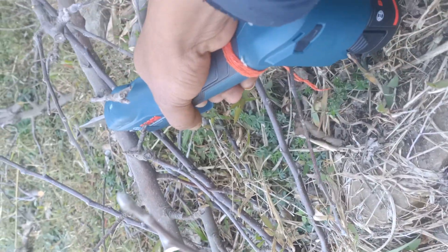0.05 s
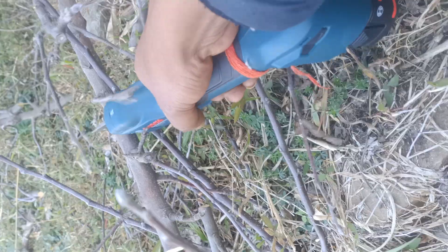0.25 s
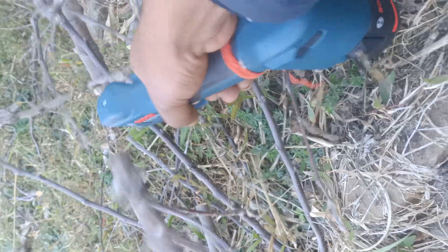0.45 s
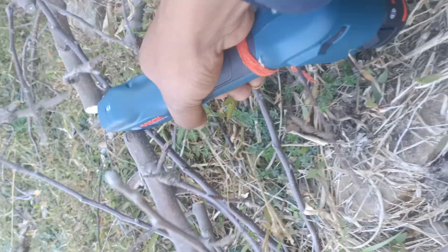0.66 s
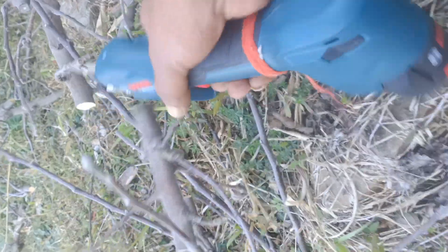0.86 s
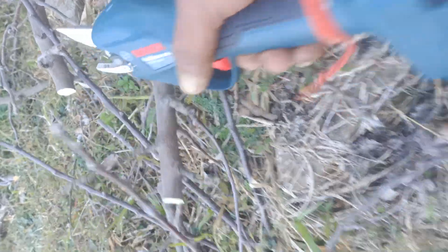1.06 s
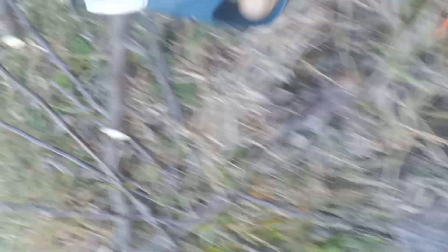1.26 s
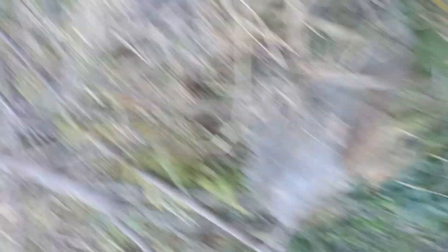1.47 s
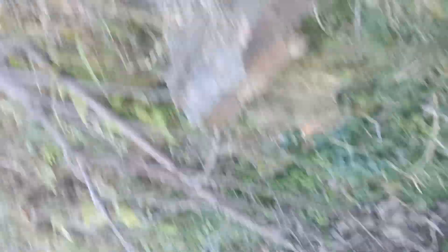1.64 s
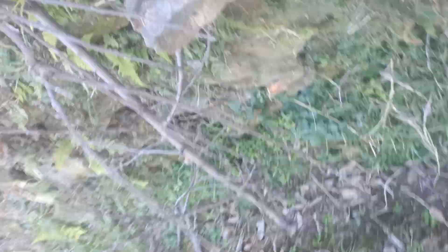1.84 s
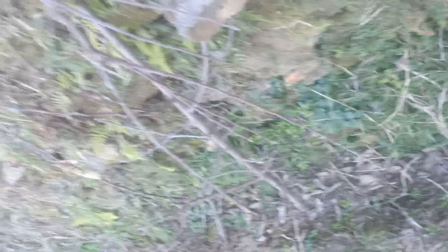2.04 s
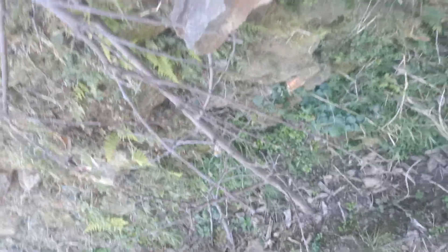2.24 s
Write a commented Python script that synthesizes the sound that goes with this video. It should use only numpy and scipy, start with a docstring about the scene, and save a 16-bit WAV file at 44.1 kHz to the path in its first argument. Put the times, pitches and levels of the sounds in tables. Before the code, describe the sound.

Electric pruning shears whir and cut a branch with a snap, whir again, then twigs rustle.

```python
"""A cordless pruner cuts a thin branch outdoors, close to a two-port microphone.
Its geared motor whines and rattles, sagging under load; fibres tear and the wood snaps and rings.
A faint tone hangs on, then the motor runs again to open the blade.
Sleeve and twigs rustle, scrape and tick as the tool is drawn away, over a light rumble of wind."""
import sys
import numpy as np
from scipy import signal
from scipy.fft import rfft, irfft, next_fast_len
from scipy.io import wavfile
from scipy.ndimage import map_coordinates

SR = 44100
rng = np.random.default_rng(int(sys.argv[2]) if len(sys.argv) > 2 else 0)


def waveform_to_disk(signal):
    """Save audio, clipped to [-1, 1], as 16-bit WAV at the path in sys.argv[1]."""
    frames = np.transpose(np.atleast_2d(signal))
    scaled = np.clip(frames, -1, 1) * 32767
    samples = np.round(scaled).astype(np.int16)
    wavfile.write(sys.argv[1], SR, samples)


N = 101429
T = np.arange(N) / SR
SNAP_S = .4313
RUSTLE_ALIKE, RUSTLE_LAG_MS = 0.27, -0.2

# Motor strokes. Each row: time in seconds, gear mesh rate in Hz, whine and rattle drive in dB.
CLOSING = [(.175, 903, -92, -64), (.203, 1800, -78, -43.5), (.226, 2750, -50.5, -36.5),
           (.24, 3142, -31.5, -29), (.275, 2948, -35.5, -26.5), (.297, 2660, -32.5, -25.5),
           (.335, 2449, -36.5, -24), (.38, 2290, -32, -27), (.428, 2560, -30.5, -23.5),
           (.445, 2500, -57, -32.5), (.49, 1480, -79, -40.5), (.53, 900, -86, -58)]
OPENING = [(.62, 900, -88, -58), (.652, 2300, -64, -35), (.677, 2930, -43, -37.5),
           (.703, 3206, -40.5, -36.5), (.73, 3263, -44.5, -39.5), (.8, 3264, -40, -37),
           (.816, 3100, -44, -39.5), (.835, 2463, -40.5, -39.5), (.854, 1917, -38, -55),
           (.866, 1685, -51, -57), (.91, 980, -73, -62)]


def stroke(curve, partials, housing, jitter, flutter_db, teeth=21):
    """One motor run: gear whine and tooth rattle sound through the housing."""
    mesh_hz, whine_db, rattle_db = in_time(curve)
    phase = running_phase(mesh_hz * (1 + jitter * drift(130)))
    whine = sum(from_db(db) * flutter(flutter_db, 160) * np.sqrt(2) * np.sin(multiple * phase)
                for multiple, db in partials)
    whine *= 1 + 0.19 * np.sin(phase / teeth)  # gear runs slightly off centre
    rattle = spread(lambda: grains(per_s=7000, spread_db=1.5), alike=0.64, arrive=from_tool)
    rattle *= flutter(1.5, 110)
    drive = from_tool(whine * from_db(whine_db)) + rattle * from_db(rattle_db)
    return colour(during(curve) * drive, housing)


def closing_motor():
    """The motor closes the blade, sagging and straining in the wood."""
    # Whine partials. Each row: multiple of the mesh rate, relative level in dB.
    partials = [(.94, -3), (1, 1.5), (1.24, -15.5), (1.89, -8.5)]
    # Housing response. Each row: frequency in Hz, left and right gain in dB.
    housing = [(98.7, -13.5, -66.5), (294, -29.5, -29.5), (677, -16, -19), (1372, -13.5, -15),
               (1980, -10.5, -3), (2470, -14, -10), (3140, -8.5, -3.5), (3460, -7, -25.5),
               (4200, -4.5, -18.5), (4880, -14.5, -39), (6400, -22, -34.5), (8160, -33, -45),
               (11500, -38.5, -35.5), (14900, -39, -55)]
    return stroke(CLOSING, partials, housing, jitter=.008, flutter_db=3.5) + colour(strain(), housing)


def strain():
    """Loaded teeth grind just under the mesh rate; a faster gear stage glides down."""
    # Faster stage. Each row: time in seconds, pitch in Hz, drive in dB.
    upper_whine = [(.255, 4950, -58), (.275, 4600, -37), (.295, 4280, -35), (.315, 4000, -35.5),
                   (.345, 3700, -45)]
    mesh_hz, _, rattle_db = in_time(CLOSING)
    grind = rough_band(.92 * mesh_hz, width_hz=140) * from_db(rattle_db - 17) * during(CLOSING)
    hz, db = in_time(upper_whine)
    phase = running_phase(hz * (1 + .004 * drift(130)))
    return from_tool(grind + np.sqrt(2) * np.sin(phase) * from_db(db) * during(upper_whine))


def opening_motor():
    """The motor runs free, with a steadier whine, to open the blade."""
    # Whine partials. Each row: multiple of the mesh rate, relative level in dB.
    partials = [(1, -1), (1.332, -17), (1.665, -12), (2.001, -10)]
    # Housing response. Each row: frequency in Hz, left and right gain in dB.
    housing = [(100, -21, -18), (302, -16, -18), (648, -8.5, -9.5), (1200, -13, -15), (1730, -6, -3),
               (2660, -18.5, -10.5), (3300, -13.5, -27), (4000, -8.5, -16), (4740, -11.5, -34),
               (6320, -20.5, -32), (8150, -34.5, -38), (15000, -36, -37)]
    return stroke(OPENING, partials, housing, jitter=.004, flutter_db=3)


def rasp():
    """The drive rasps in a climbing band as it runs back."""
    # Each row: time in seconds, centre in Hz, level in dB.
    curve = [(.66, 1498, -75), (.7, 1630, -61), (.77, 1734, -55.5), (.83, 1970, -53.5), (.86, 2004, -56)]
    hz, db = in_time(curve)
    return pan(-4) * from_tool(rough_band(hz, width_hz=134) * from_db(db) * during(curve))


def fibres():
    """Parting fibres sizzle as the blade sinks in."""
    # Each row: time in seconds, level in dB.
    curve = [(.24, -67), (.32, -63), (.425, -68)]
    db, = in_time(curve)
    cracks = rms_one(resonate(grains(per_s=3500, spread_db=1.5), hz=10500, width_hz=6500))
    return pan(6.5) * from_tool(cracks * from_db(db) * during(curve))


def snap(break_s=.4331, break_width_s=0.0011):
    """Fibres tear, then the break sets branch and blade ringing."""
    # Tear spectrum. Each row: frequency in Hz, left and right gain in dB.
    tear_colour = [(101, -37, -34.5), (255, -5.5, 3), (1050, -15.5, -12), (3000, -9.5, -7.5),
                   (5000, -4.5, -23), (7530, -12.5, -23), (9380, -10.5, -24), (12800, -12.5, -19.5),
                   (15500, -13, -25)]
    # Branch and blade modes. Each row: frequency in Hz, left and right level in dB, T60 in seconds.
    modes = [(256, -41.5, -41.5, 0.015), (401, -44, -44.5, .018), (597, -44.5, -44, .018),
             (1038, -44, -45.5, 0.013), (1910, -37, -35, 0.012), (2506, -30.5, -29.5, 0.0084),
             (3160, -31, -39, 0.0093), (4200, -29.5, -45, 0.0088)]
    tear = hit_one(burst(SNAP_S, decay_s=0.002))
    out = from_db(-22) * colour(from_tool(tear), tear_colour)
    force = np.exp(-.5 * np.minimum(np.abs(T - break_s) / break_width_s, 10) ** 2)
    for hz, left_db, right_db, t60_s in modes:
        kick = resonate(force * white(), hz, hz / 2)
        ring = resonate(kick, hz, width_hz=np.log(1000) / (np.pi * t60_s))
        out += from_db([[left_db], [right_db]]) * from_tool(hit_one(ring))
    return out


def shiver(decay_s=0.15):
    """The freed branch crackles, dying away after the snap."""
    # Each row: frequency in Hz, left and right relative gain in dB.
    spectrum = [(120, -5, -3), (300, -5, -8), (800, -4.5, -7), (2010, -2.5, 1.5), (3960, 2.5, -8),
                (6000, -12, -23), (9000, -19.5, -17.5), (14860, -11.5, -18.5)]
    crackle = rms_one(colour(spread(dry_grains, RUSTLE_ALIKE, from_tool), spectrum))
    return crackle * from_db(-53.5) * (T > SNAP_S) * np.exp(-np.abs(T - SNAP_S) / decay_s)


def tone(jitter=0.0092, octave_db=-8.5):
    """A faint, slightly rising tone with its octave hangs between the strokes."""
    # Each row: time in seconds, pitch in Hz, level in dB.
    curve = [(.475, 425, -67), (.5, 466, -65), (.525, 471.6, -54.5), (.55, 481.4, -64.5),
             (.57, 479.3, -54.5), (.595, 473, -69.5), (.635, 499, -65.5), (.73, 501, -79)]
    hz, db = in_time(curve)
    phase = running_phase(hz * (1 + jitter * drift(66)))
    wave = np.sin(phase) + from_db(octave_db) * np.sin(2 * phase)
    return from_tool(np.sqrt(2) * from_db(db) * during(curve) * wave)


def ticks():
    """Trigger, stops and twigs make contact: short bursts, each in one resonance."""
    # Each row: start in seconds, level in dB, centre and width in Hz, decay in seconds, pan in dB.
    contacts = [(0.117, -68, 4300, 700, 0.002, 13.5), (.1175, -74, 11000, 7000, .001, 7),
                (0.24, -52.5, 2850, 900, 0.003, -10), (.456, -50.5, 2360, 1540, 0.0048, 8),
                (.4942, -70, 6000, 9000, .003, 6), (0.574, -61, 394, 260, 0.0054, 0),
                (0.599, -63, 3760, 300, 0.0083, 13), (.6135, -68, 3750, 3480, 0.0016, 15),
                (.633, -58.5, 600, 1180, 0.0035, 0), (0.651, -52.5, 1760, 1020, .004, 9),
                (0.666, -63.5, 4240, 1470, 0.005, 24.5), (.669, -46, 460, 230, 0.0013, 2),
                (.872, -64, 1500, 2000, 0.0012, 9), (0.92, -54, 2220, 2470, 0.012, 11),
                (.975, -69, 2090, 2500, .002, -1), (1.035, -55, 1800, 1280, 0.006, -6),
                (1.116, -58, 895, 1480, 0.0013, -4), (1.1933, -53, 1350, 900, 0.0014, -6),
                (1.2162, -53, 1660, 800, 0.0055, -6), (1.23, -60, 3900, 500, 0.0026, 7),
                (1.2488, -54.5, 1200, 1600, 0.0012, 6), (1.263, -56, 1200, 1200, .001, 6),
                (1.345, -48.5, 1500, 1050, 0.0011, -6), (1.358, -57.5, 2950, 2500, 0.0022, 13),
                (1.3669, -57.5, 1700, 1800, 0.00036, -5), (1.413, -62.5, 4070, 400, 0.0069, 8),
                (1.437, -63.5, 4130, 1210, 0.0037, 12), (1.501, -60, 2860, 350, 0.012, -11),
                (1.534, -59, 1950, 250, 0.005, -11), (1.868, -63.5, 2100, 2200, 0.0027, 15),
                (2.096, -70, 890, 3030, 0.0055, 8)]
    near, far = np.zeros((2, N)), np.zeros((2, N))
    for start_s, db, hz, width_hz, decay_s, pan_db in contacts:
        cutoff_hz = min(0.708 * (hz + 2 * width_hz), SR / 3)  # low knocks are duller
        soften = signal.butter(2, cutoff_hz, fs=SR, output="sos")
        ring = resonate(burst(start_s, decay_s), hz, width_hz)
        tick = from_db(db) * pan(pan_db) * hit_one(signal.sosfilt(soften, ring))
        if start_s < OPENING[-1][0]:
            near += tick
        else:
            far += tick
    return from_tool(near) + ports(far, RUSTLE_LAG_MS)


def rustle():
    """Dense grains of sleeve and dry twigs follow the arm to the right."""
    # Each row: time in seconds, relative level in dB.
    curve = [(0.86, -57), (1.018, -59), (1.034, -58), (1.062, -59.5), (1.226, -55), (1.336, -56.5),
             (1.348, -50.5), (1.384, -62.5), (1.572, -59), (1.732, -73), (1.862, -63), (2.054, -80.5),
             (2.102, -75), (2.13, -91), (2.29, -79)]
    # Arm movement. Each row: time in seconds, pan in dB, right port lag in ms.
    path = [(.9, 2.5, -0.15), (1.35, 0, -0.18), (1.42, 1.5, -0.41), (1.9, -3, -0.44)]
    # Each row: frequency in Hz, left and right relative gain in dB.
    spectrum = [(100, -15, 3), (256, -3, -1.5), (595, 0, 5), (1260, 1, 7), (1900, 0.5, 10), (3300, 2.5, 3),
                (4150, 4.5, -2), (5190, -6.5, -15.5), (8650, -19, -16), (13000, -17.5, -12),
                (15300, -14, -25)]
    db, = in_time(curve)
    pan_db, lag_ms = in_time(path)
    rubbing = spread(dry_grains, RUSTLE_ALIKE, lambda x: ports(x, lag_ms))
    envelope = from_db(db + 2 + 1.03 * drift(53)) * during(curve, fade_s=0.029)
    return rms_one(colour(rubbing, spectrum)) * pan(pan_db) * envelope


def scrape():
    """A twig slides along the tool: uneven slips of bark ring three resonances."""
    # Each row: time in seconds, level in dB.
    curve = [(1.1, -70), (1.165, -56), (1.22, -63), (1.27, -58), (1.34, -67), (1.38, -64)]
    # Each row: centre and width in Hz, relative level in dB.
    modes = [(930, 150, -17), (1240, 190, 14), (1750, 130, -13)]
    db, = in_time(curve)
    slips = spread(lambda: grains(per_s=450, spread_db=2.5), RUSTLE_ALIKE,
                   lambda x: ports(x, RUSTLE_LAG_MS))
    body = sum(from_db(mode_db) * rms_one(resonate(slips, hz, width_hz))
               for hz, width_hz, mode_db in modes)
    return rms_one(body) * from_db(db) * during(curve)


def bumps():
    """The hand bumps the microphone in dull swells."""
    # Each row: peak time in seconds, level in dB, Gaussian width in seconds.
    touches = [(1.133, -60, 0.019), (1.872, -58.5, 0.032), (2.095, -62, 0.0057)]
    # Each row: frequency in Hz, left and right relative gain in dB.
    spectrum = [(30, -2, -4), (80, -1.5, -4), (156, -12, -4.5), (300, -11, -12), (714, -18, -12),
                (2000, -47, -41)]
    swell = sum(from_db(db) * np.exp(-.5 * ((T - s) / width_s) ** 2) for s, db, width_s in touches)
    return swell * rms_one(colour(spread(white, RUSTLE_ALIKE), spectrum))


def wind():
    """Gusts rumble on the ports."""
    # Each row: time in seconds, relative level in dB.
    gusts = [(0.0, -56.5), (0.09, -68.5), (0.35, -65), (0.38, -72), (0.46, -61), (0.58, -68), (0.61, -64),
             (1.37, -65), (1.38, -53), (1.58, -69.5), (1.89, -57), (2.15, -71.5), (2.19, -56),
             (2.29, -63.5)]
    # Each row: frequency in Hz, left and right relative gain in dB.
    spectrum = [(12.2, -8.5, -10), (26, -15, -0.5), (43.8, -1, -2.5), (71.5, -15, -11.5), (111, -35, -21.5),
                (202.7, -29.5, -30.5), (600, -55, -58)]
    db, = in_time(gusts)
    return from_db(db + 3) * rms_one(colour(spread(white, alike=0.11), spectrum))


def air():
    """Quiet, steady hiss of outdoor air."""
    # Each row: frequency in Hz, left and right relative gain in dB.
    spectrum = [(30, 10, -6.5), (119.2, 0, -1.5), (300, -2.5, 1), (710, -8.5, -7.5), (1490, -15.5, -13),
                (3200, -12.5, -14), (5770, -22.5, -23), (10000, -24, -22.5), (15500, -21, -22)]
    return from_db(-70.5) * rms_one(colour(spread(white, alike=0.34), spectrum))


def from_tool(x):
    """The tool's sound bends round the microphone body and reaches the ports out of step."""
    # Each row: frequency in Hz, left port lead in radians.
    phase_lead = [(200, 0.34), (1380, 0.75), (2350, 2.13), (2760, 1.07), (3100, -1.27), (4130, -1.7),
                  (8000, 0)]
    hz, lead_rad = np.transpose(phase_lead)
    turn_rad = np.interp(np.arange(N // 2 + 1) * SR / N, hz, lead_rad) / 2
    return irfft(rfft(x) * np.exp(1j * np.array([turn_rad, -turn_rad])), N)


def ports(x, lag_ms=0):
    """Stereo arrival; a positive lag puts the right port behind the left."""
    shift = lag_ms * SR / 2000
    return np.array([map_coordinates(channel, [np.arange(N) + side * shift], order=3, mode="mirror")
                     for channel, side in zip(np.broadcast_to(x, (2, N)), (1, -1))])


def spread(draw, alike, arrive=ports):
    """Direct sound with power share `alike`, plus a scattered part for each port."""
    return np.sqrt(alike) * arrive(draw()) + np.sqrt(1 - alike) * np.array([draw(), draw()])


def pan(db):
    """Stereo gains for a left-minus-right level."""
    return from_db(np.vstack([db, -db]) / 2)


def colour(x, table):
    """Filter with left and right responses that share one causal phase."""
    hz, *sides = np.transpose(table)
    size = 2 * next_fast_len(N)
    log_hz = np.log(np.maximum(np.arange(size // 2 + 1) * SR / size, 1))
    gains = from_db([np.interp(log_hz, np.log(hz), db) for db in sides])
    cepstrum = irfft(np.log(gains.mean(axis=0)))
    phase = rfft(2 * cepstrum[:size // 2], size).imag
    return irfft(rfft(x, size) * gains * np.exp(1j * phase))[:, :N]


def resonate(x, hz, width_hz):
    """Two-pole resonance."""
    r = np.exp(-np.pi * width_hz / SR)
    poles = [1, -2 * r * np.cos(2 * np.pi * hz / SR), r * r]
    return signal.lfilter([1, 0, -1], poles, x + 1e-18 * white())


def white():
    return rng.standard_normal(N)


def grains(per_s, spread_db):
    """Random clicks of uneven size."""
    sizes = from_db(spread_db * np.minimum(rng.exponential(1, N), 5))
    return rms_one((rng.random(N) < per_s / SR) * sizes * rng.choice([-1, 1], N))


def dry_grains():
    """Fine rubbing grains with sparse twig crackles."""
    return rms_one(grains(per_s=9000, spread_db=2.5) + from_db(-7) * grains(per_s=200, spread_db=2))


def burst(start_s, decay_s):
    """Sudden, decaying noise."""
    return white() * (T >= start_s) * np.exp(-np.minimum(np.abs(T - start_s) / decay_s, 60))


def rough_band(hz, width_hz):
    """Narrow noise around a moving centre."""
    phase = running_phase(hz)
    return rms_one(drift(width_hz) * np.cos(phase) + drift(width_hz) * np.sin(phase))


def drift(corner_hz):
    """Low-passed noise, unit rms."""
    r = np.exp(-2 * np.pi * corner_hz / SR)
    return rms_one(signal.lfilter([1], [1, -2 * r, r * r], rng.standard_normal(N + SR))[SR:])


def flutter(depth_db, corner_hz):
    """Randomly wavering gain, unit rms."""
    return rms_one(from_db(depth_db * drift(corner_hz)))


def running_phase(hz):
    return 2 * np.pi * np.cumsum(hz) / SR


def in_time(rows):
    """Interpolate a curve's columns at every sample."""
    times_s, *columns = np.transpose(rows)
    return [np.interp(T, times_s, column) for column in columns]


def during(rows, fade_s=0.0034):
    """One while a curve lasts, fading outside it."""
    outside_s = np.maximum(rows[0][0] - T, T - rows[-1][0])
    return np.exp(-np.maximum(0, outside_s) / fade_s)


def from_db(db):
    return 10 ** (np.asarray(db) / 20)


def rms_one(x):
    return x / np.sqrt(np.mean(x ** 2) + 1e-30)


def hit_one(x, window_s=.01):
    """Scale a hit to the energy of unit rms over the window."""
    return rms_one(x) * np.sqrt(window_s * SR / N)


def scene():
    """Close, snap, open, draw away."""
    cut = closing_motor() + fibres() + snap() + shiver() + tone()
    release = opening_motor() + rasp()
    handling = ticks() + rustle() + scrape() + bumps()
    return cut + release + handling + wind() + air()


def record(dry, peak_limit=0.4, cutoff_hz=15700):
    """Soft peak limit, then a steep low-pass."""
    rounded = peak_limit * np.tanh(dry / peak_limit)
    return signal.sosfilt(signal.ellip(10, .1, 70, cutoff_hz, fs=SR, output="sos"), rounded)


dry = scene()
out = record(dry)
waveform_to_disk(out)
```